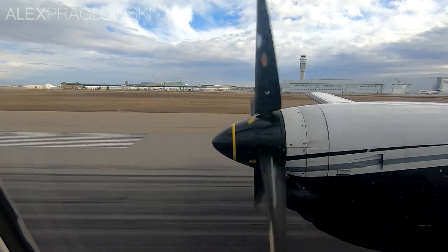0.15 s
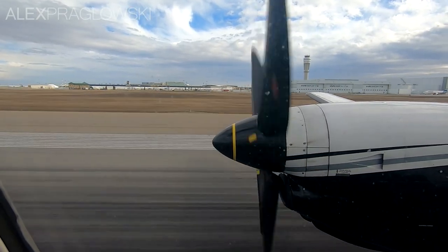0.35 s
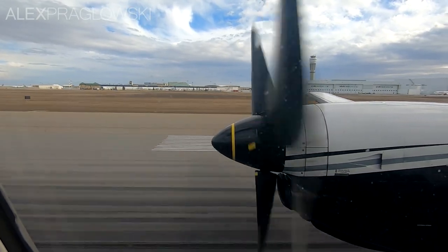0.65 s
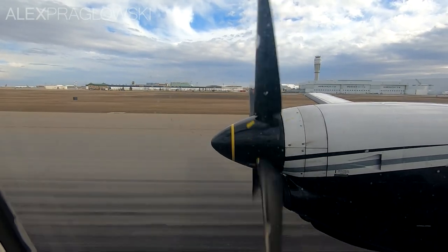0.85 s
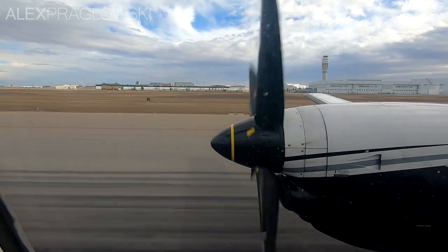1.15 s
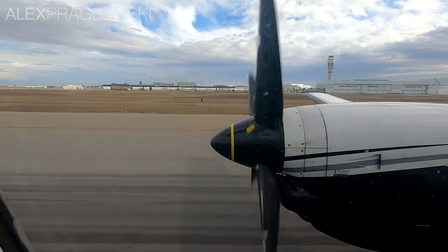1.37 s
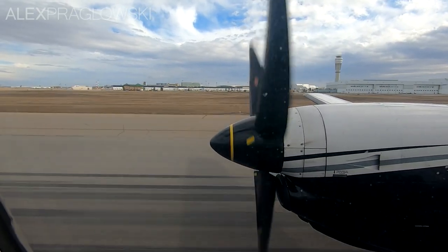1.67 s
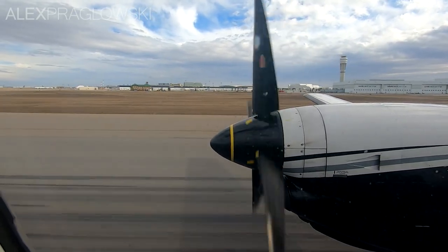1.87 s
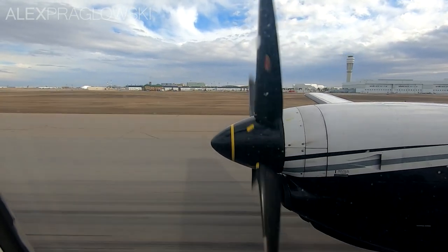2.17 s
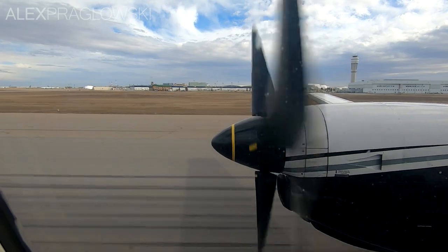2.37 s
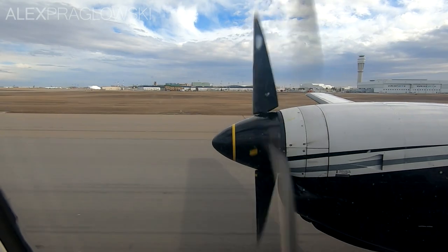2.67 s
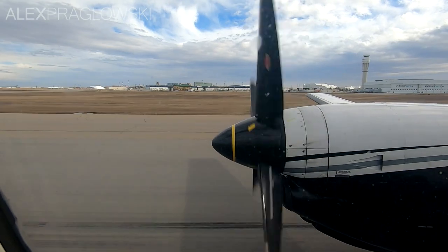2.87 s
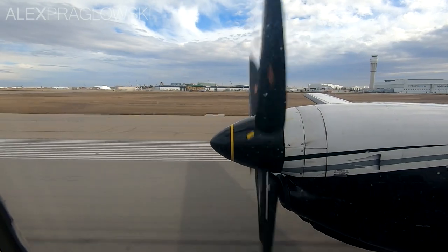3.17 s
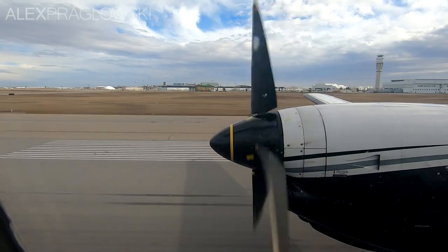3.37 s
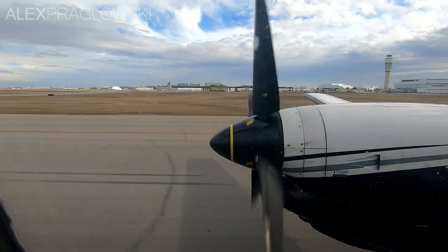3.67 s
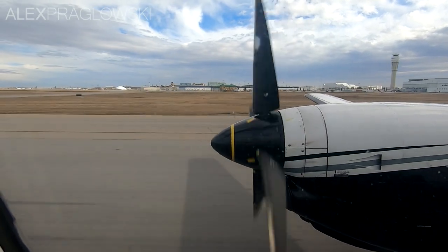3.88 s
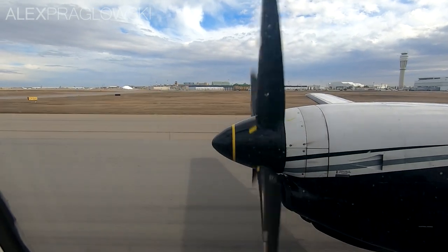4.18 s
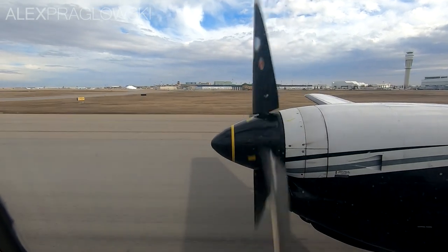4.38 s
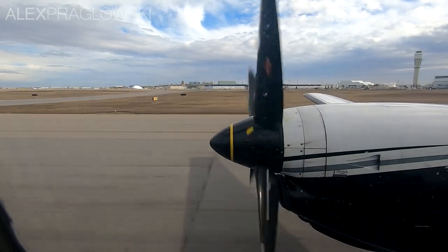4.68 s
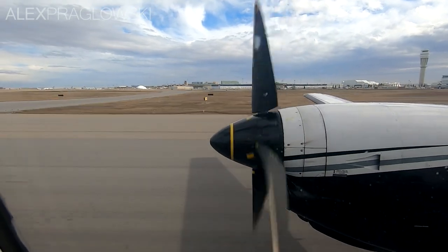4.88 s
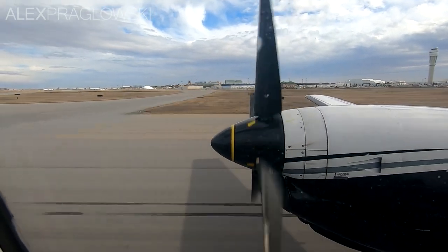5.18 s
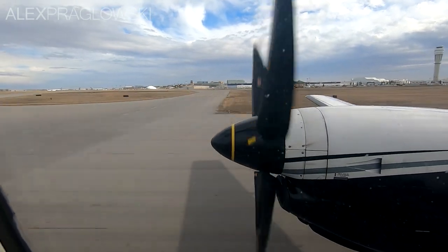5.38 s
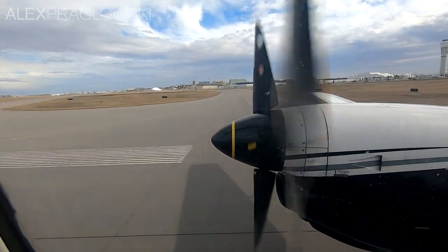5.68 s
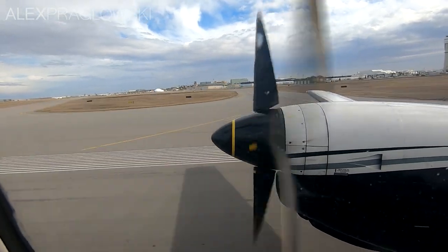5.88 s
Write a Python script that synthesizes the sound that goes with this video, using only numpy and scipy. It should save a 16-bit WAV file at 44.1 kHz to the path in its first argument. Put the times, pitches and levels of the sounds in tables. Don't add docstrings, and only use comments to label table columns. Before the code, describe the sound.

Close, enclosed cabin sound of a turboprop taxiing, already at full strength at 0 s and continuing to the end at about 6 s. A loud, very low propeller drone dominates, a smooth, fast pulse with a few darker overtones that slowly beat and shift. Below it are wheel and airframe rumble; above it, muffled slipstream roar, soft air hiss and a thin turbine hiss with barely audible whistles. Around 0.2 to 0.3 s loose trim gives four quick, faint knocks, with two softer ones near 0.5 s. From about 0.9 to 2.5 s rough pavement shakes the cabin and the drone grows thicker, with another jolt at 3 s. The ground then eases. Near 3.9 s a gust brightens the hiss; the drone sags slightly in pitch until 4.8 s, exposing fine trim buzzing. A small knock comes at 4.9 s, then the pitch recovers, wavering to the end.

```python
import sys
import numpy as np
from scipy import signal
from scipy.fft import rfft, irfft, next_fast_len
from scipy.io import wavfile
from scipy.ndimage import uniform_filter1d, minimum_filter1d

SR = 44100
rng = np.random.default_rng(int(sys.argv[2]) if len(sys.argv) > 2 else 0)


def boost_factor(decibels):
    exponent = np.asarray(decibels, float) / 20
    return 10 ** exponent


def unload_wav(signal):
    wavfile.write(
        sys.argv[1],
        SR,
        np.round(np.clip(np.atleast_2d(signal).T, -1, 1) * 32767).astype(np.int16),
    )


N = 266364


def rms_one(x):
    return x / np.sqrt(np.mean(x ** 2) + 1e-20)


def in_time(rows):
    s, *columns = np.transpose(rows)
    return [np.interp(np.arange(N) / SR, s, column) for column in columns]


def swell(s, length):
    return np.exp(-(2 * (np.arange(N) / SR - s) / length) ** 2)


def drift(rate):
    r = np.exp(-80 * np.pi * rate / SR)
    noise = rng.standard_normal(N // 40 + 2002)
    slow = signal.lfilter([1], [1, -2 * r, r * r], noise)[2000:]
    return np.interp(np.arange(N) / 40, np.arange(len(slow)), rms_one(slow))


def tone(angle, level_db):
    return np.sqrt(2) * boost_factor(level_db) * np.cos(angle)


def coloured(spectrum, patchy_db, count):
    hz, level_db = np.transpose(spectrum)
    size = next_fast_len(N)
    log_hz = np.log(np.fft.rfftfreq(size, 1 / SR) + 0.00092)
    shape = boost_factor(np.interp(log_hz, np.log(hz), level_db, left=-90, right=-90))
    noise = shape * rfft(rng.standard_normal(size))
    centres = np.linspace(np.log(hz[0]), np.log(hz[-1]), count)
    spacing = centres[1] - centres[0]
    together = drift(3.0)
    out = 0
    for centre in centres:
        share = np.clip(1 - abs(log_hz - centre) / spacing, 0, 1)
        flicker_db = patchy_db * (together + drift(3.9))
        out = out + irfft(noise * share, size)[:N] * boost_factor(flicker_db)
    return rms_one(out)


def resonate(x, hz, width):
    r = np.exp(-np.pi * width / SR)
    return signal.lfilter([1 - r, 0, r - 1], [1, -2 * r * np.cos(2 * np.pi * hz / SR), r * r], x + 1e-18)


def each_blade(angle, lag, sharp):
    return np.exp(sharp * (np.cos(angle - lag) - 1))


WALL_SKEW = [(1, 0, .02), (2, -.5, .12), (3, .6, .2), (4, 2, .4), (.5, -1.5, 1.2)]
# multiple of blade rate, rms level in dB.
WEAK_TONES = [(.25, -47.5), (5, -54), (6, -51), (7, -58), (8, -57.5), (10, -65), (11, -67.5), (12, -74),
              (14, -71)]


def propeller(angle, skew, levels_db):
    out = 0
    for (multiple, lead, wander), level_db in zip(WALL_SKEW, levels_db):
        skewed = angle + skew * (multiple > 1)
        out = out + tone(multiple * skewed + lead + wander * drift(1.0), level_db)
    for multiple, level_db in WEAK_TONES:
        out += tone(multiple * (angle + skew) + 1.2 * drift(2.5), level_db + 2.0 * drift(1.3))
    return out


# rms level in dB, change in dB per dB of load.
PULSE_LEVELS = [(-12, -.5), (-18, 1.15), (-28.5, 0.6), (-41, 0.74)]
# time in seconds, multiple of blade rate, change in dB, length in seconds.
FAR_BEATS = [(0.246, 3, 2.5, 0.42), (0.722, 3, -3, 0.35), (1.349, 3, 1, 0.71), (1.88, 3, -4.5, 0.23),
             (2.274, 3, 3, 0.45), (3.16, 3, 1, 0.23), (3.753, 3, 3.5, 0.53), (5.0, 3, 2.5, 0.3),
             (5.45, 3, 4, 0.58), (6.04, 3, 0.5, 0.22), (6.04, 2, -1, 0.28), (.6, 1, -0.44, 0.75),
             (2.4, 1, 0.8, 0.42), (3.7, 1, 0.8, .5), (4.4, 1, 0.2, 0.28), (3.9, 2, -0.1, 0.45),
             (4.7, 2, 0, .4), (0.085, 4, -14, .5), (.45, 4, -5, .3), (1.06, 4, 3, 0.3),
             (1.53, 4, -9.5, 0.45), (2.4, 4, -4, 0.14), (3.3, 4, 2.5, .2), (4.2, 4, -23.5, .45),
             (4.45, 4, -7, .2), (5.2, 4, -13, 0.53), (5.55, 4, -12.5, 0.46)]


def pulse_levels(load_db):
    levels_db = [db + share * load_db for db, share in PULSE_LEVELS]
    for s, multiple, change_db, length in FAR_BEATS:
        index = round(multiple) - 1
        levels_db[index] = levels_db[index] + change_db * swell(s, length)
    return levels_db


# time in seconds, blade rate in Hz, extra blade load in dB.
BLADE_COURSE = [(0, 92.98, 0), (.6, 92.75, 0.5), (.95, 92.29, 1.3), (1.3, 92.25, 1.5), (1.65, 92.43, 1.5),
                (2.15, 92.43, 3), (2.6, 92.75, 0), (3.2, 92.74, 0), (3.85, 92.64, 0.5), (4.4, 92.04, 0),
                (4.8, 91.8, 0.8), (5.1, 92.35, 0.5), (5.45, 92.68, 0.5), (5.72, 92.57, -0.3),
                (5.9, 92.05, -0.8), (6.04, 92.77, -1.1)]


def blade_motion():
    blade_hz, load_db = in_time(BLADE_COURSE)
    angle = 2 * np.pi * np.cumsum(blade_hz) / SR + 3.3
    governor_s = .5
    speeding = uniform_filter1d(np.gradient(blade_hz) * SR, round(governor_s * SR))
    fast_hz = blade_hz - blade_hz.mean()
    skew = -.13 * speeding - .06 * load_db - .25 * fast_hz
    return angle, skew, load_db, fast_hz


# time in seconds, rumble level in dB, length in seconds.
ROUGH_PATCHES = [
    (.47, -29.5, 0.23),
    (0.959, -25.5, 0.37),
    (1.657, -25, 0.47),
    (2.17, -25, 0.21),
    (2.601, -30, .4),
    (3.037, -26.5, 0.15),
    (4.2, -30.5, .6),
    (4.766, -30.5, 0.38),
    (5.504, -32.5, .5),
]


def pavement():
    smooth_db = -33.5 - 0.4 * np.arange(N) / SR
    patches = sum(boost_factor(2 * db) * swell(s, length) for s, db, length in ROUGH_PATCHES)
    return 10 * np.log10(boost_factor(2 * smooth_db) + patches)


# time in seconds, turning tone in Hz, rms level in dB.
WHEEL_TURNS = [
    (0, 26.25, -40),
    (.85, 27.28, -44.5),
    (2.2, 28.18, -30.5),
    (3.4, 29.8, -45),
    (4.5, 31.8, -33),
    (6.04, 30, -47.5),
]
# frequency in Hz, level in dB per Hz.
RUMBLE_SPECTRUM = [(12, -23), (22, -14), (36, -6.5), (46, 4), (58, -5.5), (72, -10.5), (85, -21.5)]


def undercarriage(shake_db):
    turns_hz, wheel_db = in_time(WHEEL_TURNS)
    wheels = tone(2 * np.pi * np.cumsum(turns_hz) / SR, wheel_db)
    return wheels + boost_factor(shake_db - 2.5) * coloured(RUMBLE_SPECTRUM, patchy_db=0.0, count=4)


# time in seconds, hiss level in dB.
GUST_COURSE = [(0, -54), (.12, -56.5), (.19, -54.5), (.21, -53), (.28, -55.5), (.33, -56.5), (.5, -55.5),
               (.65, -58.5), (1.1, -56), (1.85, -56.5), (2.5, -59), (3.3, -59.5), (3.65, -59), (3.9, -55),
               (4.6, -57.5), (4.95, -56), (5.6, -58), (6.04, -59)]


def gusts():
    usual_db = -56.5
    return in_time(GUST_COURSE)[0] - usual_db


# frequency in Hz, level in dB per Hz.
BOOM_SPECTRUM = [(60, -6), (75, -1), (112, 2), (128, -2), (140, -2.5), (152, -3.5), (200, -1), (228, -5),
                 (241, -10), (255, -5), (290, -8.5), (340, -13), (400, -16.5), (450, -29)]
# frequency in Hz, level in dB per Hz.
ROAR_SPECTRUM = [(330, -13.5), (390, 2), (435, -2.5), (520, 1.5), (640, 1), (740, -5.5), (815, -11),
                 (900, -8.5), (1000, -10), (1220, -15), (1420, -21), (1800, -31)]
# frequency in Hz, level in dB per Hz.
HISS_SPECTRUM = [(820, -30), (1400, 0), (2130, -1.5), (2810, -2.5), (3900, -9), (4300, -6), (5520, -16),
                 (6900, -21), (7400, -26), (9620, -51.5), (16300, -120)]


def airflow(angle, shaken_db, roar_db, hiss_db):
    boom = boost_factor(-31 + shaken_db) * coloured(BOOM_SPECTRUM, patchy_db=2.0, count=6)
    roar_wake_db = 0.32 * each_blade(angle, lag=0.72, sharp=2.4)
    roar = coloured(ROAR_SPECTRUM, patchy_db=0.88, count=6) * boost_factor(roar_db + roar_wake_db)
    hiss_wake_db = 2.3 * each_blade(angle, lag=2.6, sharp=3.3)
    hiss = coloured(HISS_SPECTRUM, patchy_db=0.47, count=6) * boost_factor(hiss_db + hiss_wake_db)
    return boom + roar + hiss


# frequency in Hz, level in dB per Hz.
TURBINE_SPECTRUM = [(6600, -25.5), (7100, -6.5), (7700, -0.5), (9300, 0.5), (9800, -9), (10150, -22.5),
                    (10600, -9.5), (11350, -26), (11800, -16), (12800, -16), (13500, -21), (14400, -29),
                    (15400, -37.5)]
# frequency in Hz, width in Hz, level over the turbine hiss in dB.
WHISTLES = [(8500, 46, -16), (9000, 30, -20), (10700, 51, -28), (11140, 36, -31.5)]


def turbine(top_db):
    white = rng.standard_normal(N)
    whistles = 0
    for hz, width, db in WHISTLES:
        narrow = resonate(resonate(white, hz, width), hz, width)
        whistles = whistles + boost_factor(db + 3.3 * drift(3.3)) * rms_one(narrow)
    return boost_factor(top_db) * (.9 * coloured(TURBINE_SPECTRUM, patchy_db=-1.0, count=8) + whistles)


# frequency in Hz, width in Hz, level in dB.
TRIM_PANELS = [(4380, 1600, 3), (6300, 880, -2.5), (7900, 950, 2.5), (9100, 830, -2)]
# time in seconds, peak level in dB.
TRIM_KNOCKS = [
    (0.2069, -50.5),
    (0.2293, -50),
    (0.2503, -50),
    (0.2727, -50),
    (0.458, -58),
    (0.4982, -58),
    (4.911, -56),
]


def trim(angle, top_db):
    passes = np.flatnonzero(np.diff(np.floor((angle - 4.9) / (2 * np.pi))))
    ticks = np.zeros(N)
    uneven_db = 3 * rng.standard_normal(len(passes))
    ticks[passes] = boost_factor(top_db[passes] + 8.5 + uneven_db)
    for s, db in TRIM_KNOCKS:
        ticks[round(s * SR)] += boost_factor(db + 2.0)
    chatter = signal.lfilter([1], [1, -.988], ticks) * rng.standard_normal(N)
    buzz = 1.4 * sum(boost_factor(db) * resonate(chatter, hz, width) for hz, width, db in TRIM_PANELS)
    return signal.sosfilt(signal.cheby2(8, 40, 10000, fs=SR, output="sos"), buzz)


def limit(x, ceiling, release_db_s, smooth_s):
    climb_db = release_db_s * np.arange(N) / SR
    over_db = .75 * np.maximum(20 * np.log10(abs(x) / ceiling + 1e-9), 0)
    held_db = np.maximum.accumulate(over_db + climb_db, axis=-1) - climb_db
    span = round(smooth_s * SR)
    ahead_db = -minimum_filter1d(-held_db, span)
    smooth_db = uniform_filter1d(uniform_filter1d(ahead_db, span // 2), span // 2)
    return x * boost_factor(-smooth_db)


def scene():
    angle, skew, load_db, fast_hz = blade_motion()
    shake_db = pavement()
    gust_db = gusts()
    rough_db = uniform_filter1d(shake_db - shake_db.mean(), round(.6 * SR))

    unbalance_db = shake_db - 4
    cabin = propeller(angle, skew, pulse_levels(load_db) + [unbalance_db])
    cabin += undercarriage(shake_db)

    roar_db = -43.5 + 0.66 * gust_db + .15 * rough_db + 2 * fast_hz + .3 * load_db
    cabin += airflow(angle, 0.4 * rough_db, roar_db, -56 + gust_db)

    buzz_db = -71.5
    livelier_db = 1.4 * gust_db - 1.5 * fast_hz
    cabin += turbine(buzz_db + .7 * livelier_db)
    cabin += trim(angle, buzz_db + livelier_db)
    return cabin[None]


def top_cut(x):
    return signal.sosfilt(signal.butter(12, 15460, fs=SR, output="sos"), x)


def record(dry):
    mix = limit(dry, ceiling=.6, release_db_s=61, smooth_s=0.012) - .0039
    return top_cut(mix)


dry = scene()
out = record(dry)
unload_wav(out)
```